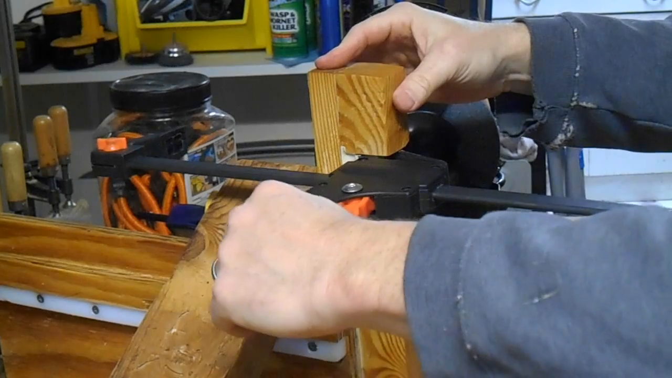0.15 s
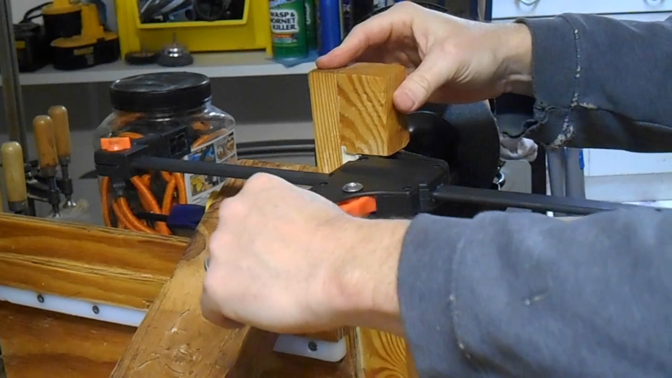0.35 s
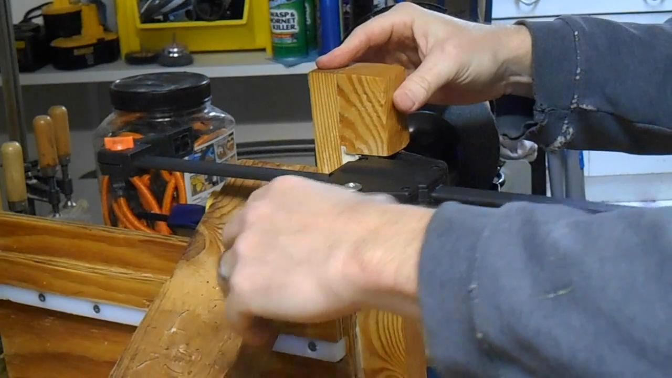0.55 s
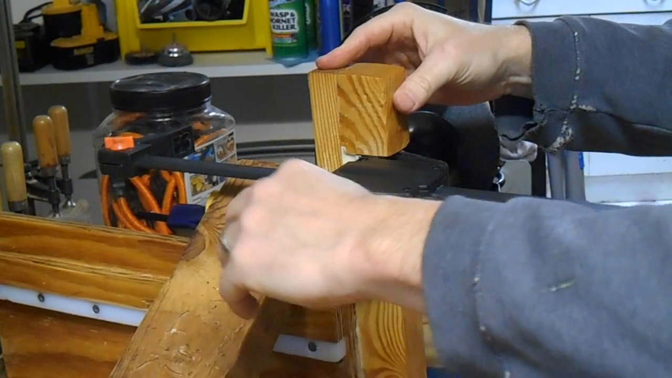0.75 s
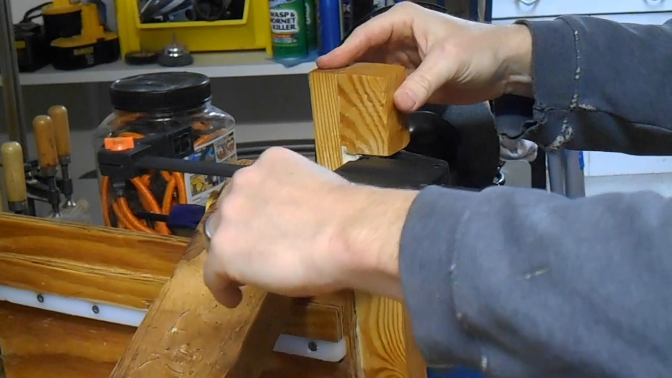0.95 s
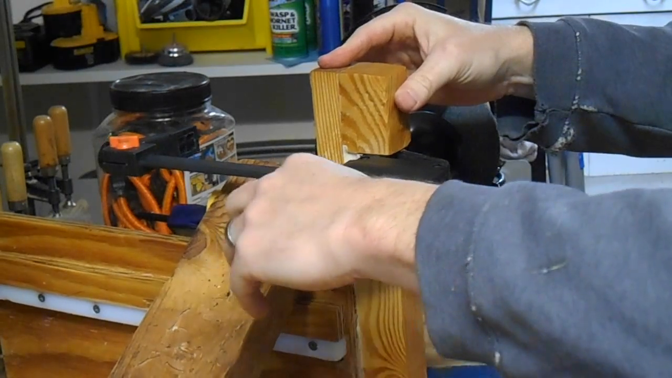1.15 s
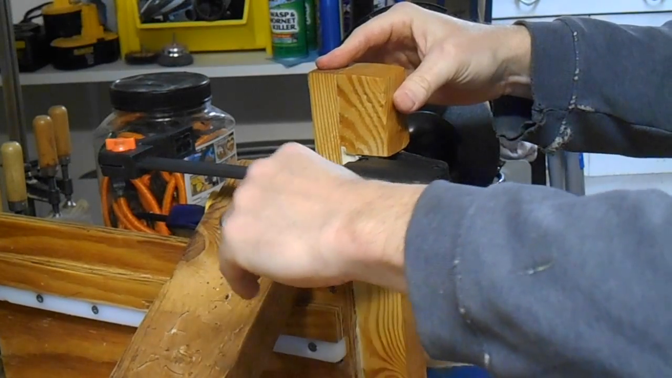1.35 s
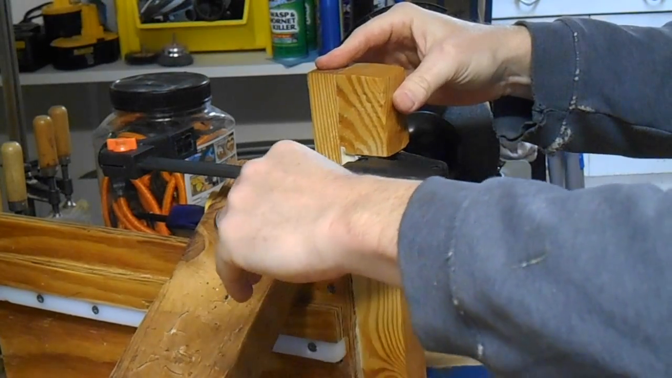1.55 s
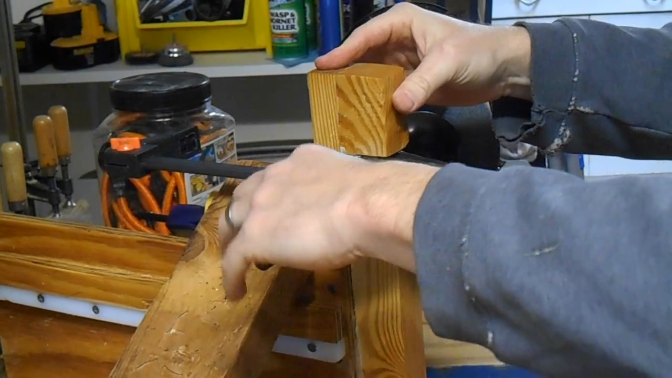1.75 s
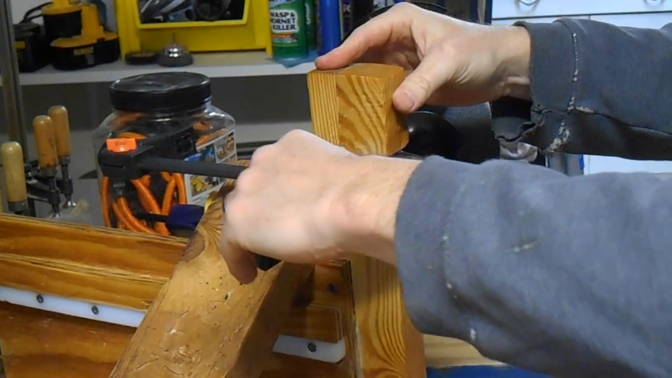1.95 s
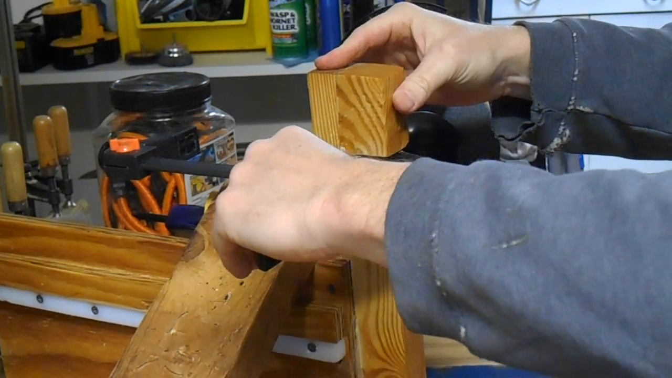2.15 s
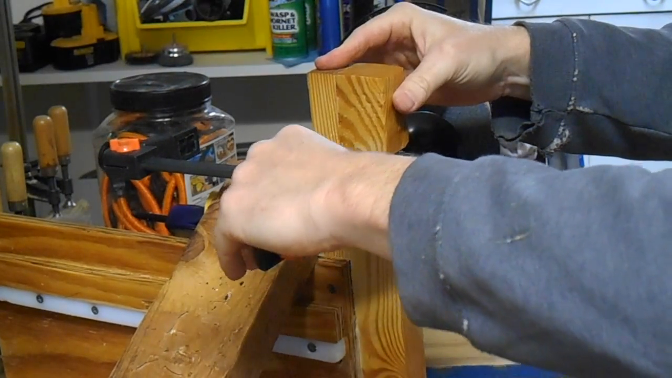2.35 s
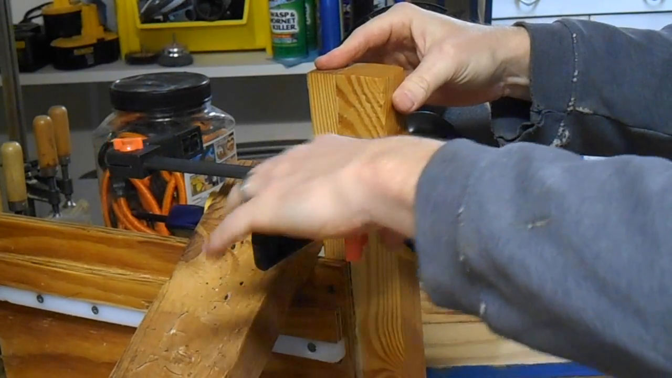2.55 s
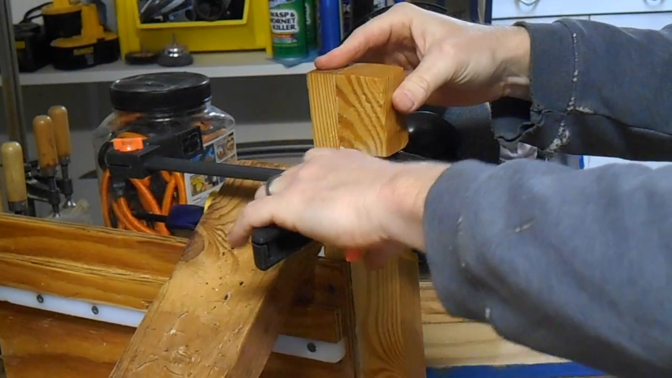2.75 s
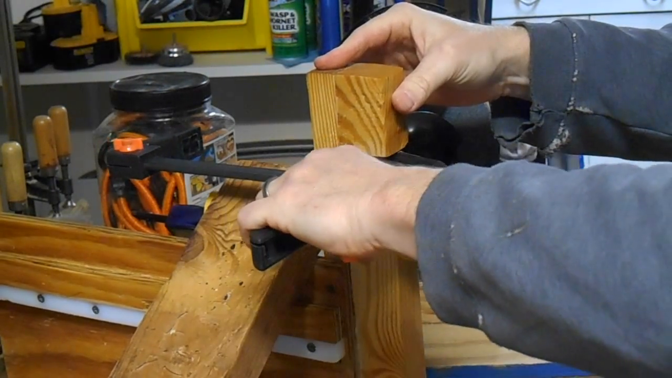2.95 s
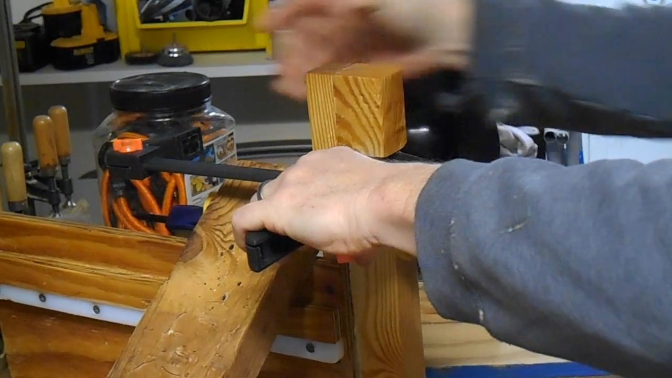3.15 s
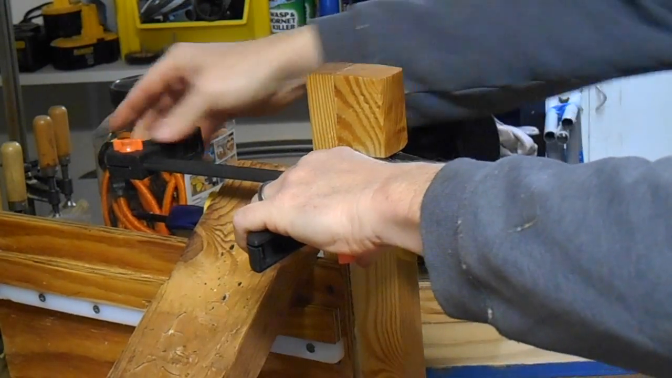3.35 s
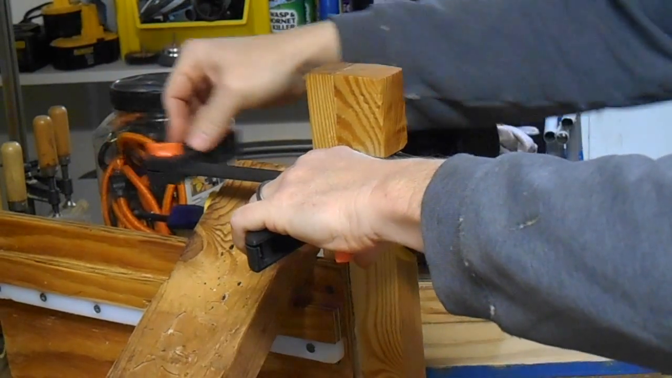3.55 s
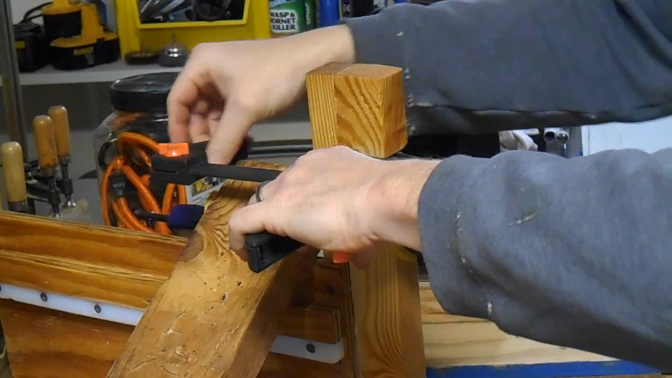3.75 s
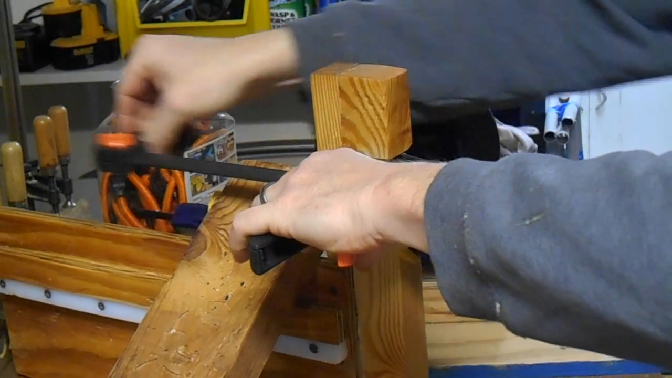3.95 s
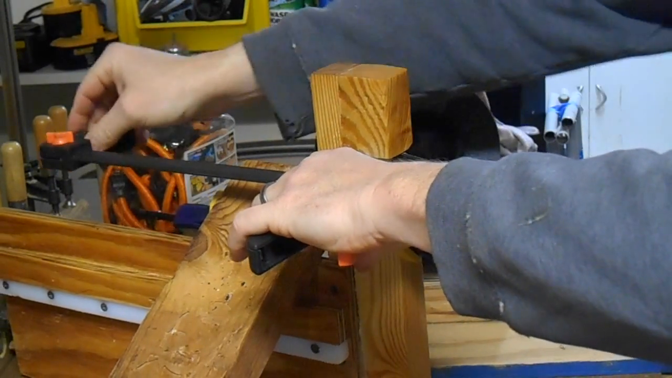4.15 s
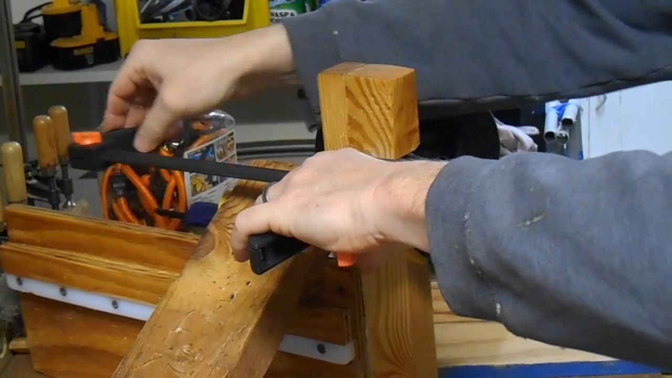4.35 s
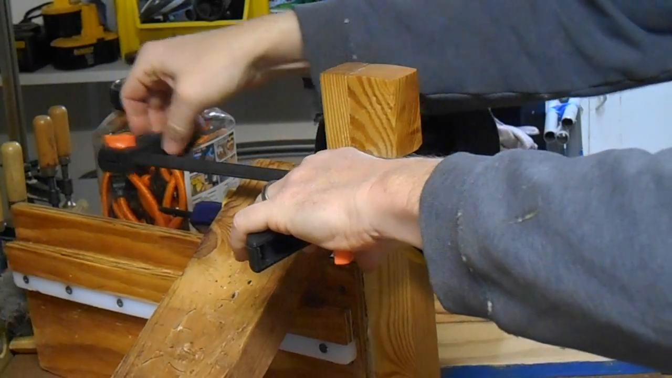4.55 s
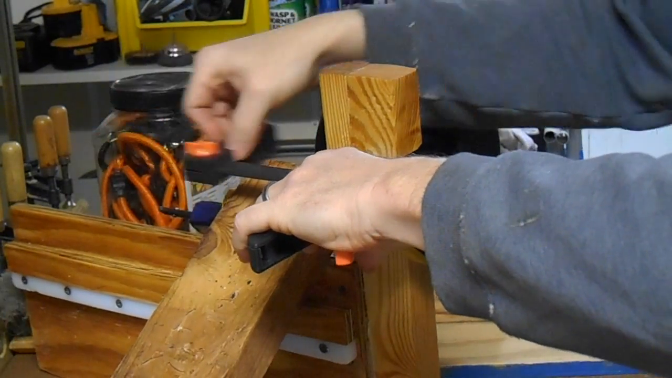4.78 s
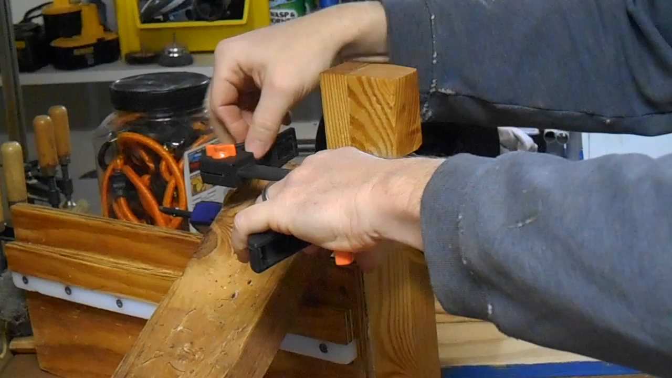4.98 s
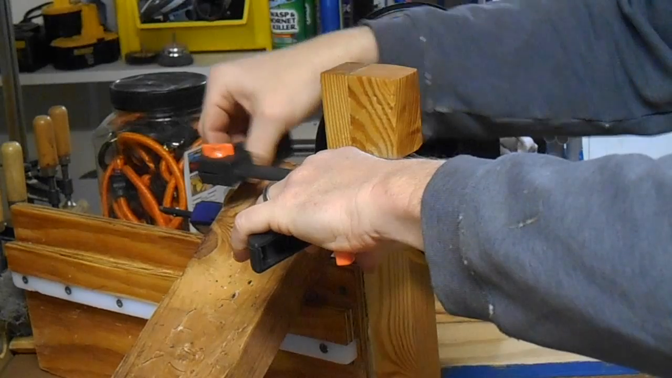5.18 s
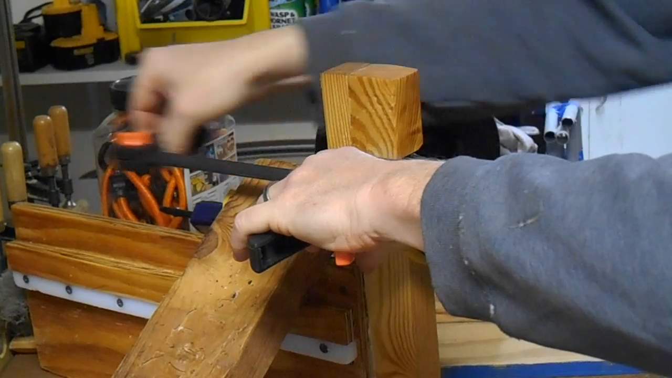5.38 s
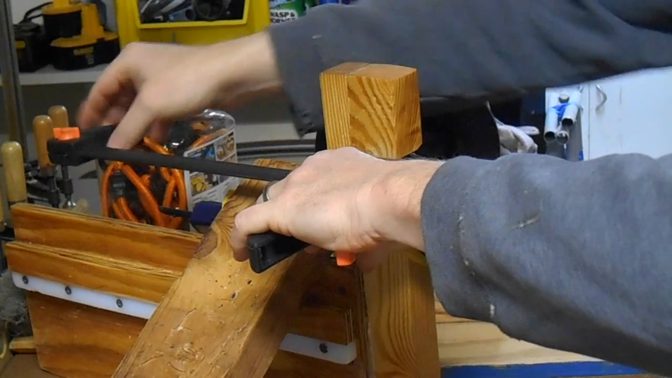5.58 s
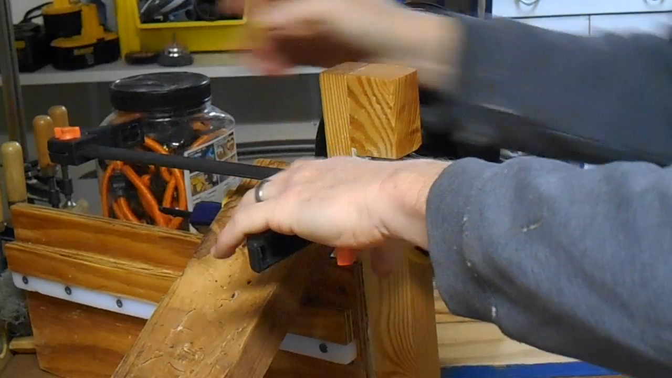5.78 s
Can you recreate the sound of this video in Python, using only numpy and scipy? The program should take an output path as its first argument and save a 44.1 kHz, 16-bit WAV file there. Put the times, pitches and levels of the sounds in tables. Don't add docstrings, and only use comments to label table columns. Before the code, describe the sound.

Hard double snaps and short plate rattles from a hand clamp on a wooden bench, followed by uneven metallic sliding strokes ending in loud clacks.

```python
import sys
import numpy as np
from scipy import signal
from scipy.io import wavfile
from scipy.ndimage import uniform_filter1d

SR = 44100
rng = np.random.default_rng(int(sys.argv[2]) if len(sys.argv) > 2 else 0)


def store_wav(level_fs):
    pcm = np.round(np.clip(np.atleast_2d(level_fs), -1, 1) * 32767)
    wavfile.write(sys.argv[1], SR, pcm.T.astype(np.int16))


def ratio_of_db(decibels):
    return 10 ** (np.asarray(decibels, float) / 20)


N = 256662


def evened(x):
    return x / np.sqrt(np.mean(x ** 2) + 1e-20)


def read(points, hz):
    f, value = np.transpose(points)
    return np.interp(np.log(hz + 1), np.log(f + 1), value)


def coloured(x, colour, tilt_db=0.):
    hz = np.fft.rfftfreq(512, 1 / SR)
    octaves = np.log2((np.minimum(hz, 9000) + 200) / 3000)
    level_db = np.maximum(read(colour, hz) + tilt_db * octaves, -90)
    log_gain = np.log(ratio_of_db(level_db))
    circle = np.concatenate([log_gain, log_gain[-2:0:-1]])
    taps = np.fft.ifft(np.exp(np.conj(signal.hilbert(circle)))).real
    return signal.oaconvolve(x, taps / np.linalg.norm(taps))[:len(x)]


def resonate(x, hz, width):
    r = np.exp(-np.pi * width / SR)
    pole = r * np.exp(2j * np.pi * hz / SR)
    return np.sqrt(2 * (1 - r * r)) * signal.lfilter([1], [1, -pole], x).real


def above(x, hz):
    return signal.sosfilt(signal.butter(2, hz, "high", fs=SR, output="sos"), x)


def wander(length, span):
    return evened(uniform_filter1d(uniform_filter1d(rng.standard_normal(length), span), span))


def add(mix, s, sound):
    part = mix[round(s * SR):][:len(sound)]
    part += sound[:len(part)]


def blows(rows, colour, ring_db, ring_width, rise_s, rise_share, tick_db):
    t = np.arange(2600) / SR
    crack, far, push = np.zeros((3, N))
    for s, db, hz, bench_db, tilt_db, ms in rows:
        rattle = rng.standard_normal(len(t))
        decay = np.clip(ms, .5, 15) / 1000
        shape = np.exp(-t / decay) * np.minimum(t / (rise_s + rise_share * decay), 1)
        tilt_db = np.clip(tilt_db, -10, 10)
        tick = ratio_of_db(tick_db) * (t == 8 / SR)
        dense = coloured(rattle, colour, tilt_db)
        dense = dense / np.sqrt(uniform_filter1d(dense ** 2, size=48) + .1)
        burst = dense * shape + coloured(tick, colour, tilt_db) / 2
        ring = ratio_of_db(ring_db) * resonate(rattle * shape + tick, hz, ring_width)
        add(crack, s, ratio_of_db(db - 12.5) * (burst + ring))
        click = np.linalg.norm(shape) * coloured(1. * (t == 0), colour, tilt_db)
        add(far, s, ratio_of_db(db - 11.5) * click)
        add(push, s + 0.0056, ratio_of_db(db + bench_db) * signal.windows.hann(70))
    return np.array([crack, far, push])


# frequency in Hz, level in dB.
KNOCK_COLOUR = [(290, -40), (500, -7.5), (598, -5.5), (880, 5), (1110, 1), (1430, -5.5), (2480, 8),
                (5290, 0.5), (5740, 5), (9560, -11), (13500, -25)]
TRIGGER_HZ, TOUCH_HZ = 2210, 1990
STOP_BENCH_DB = -37.5


def knock(rows):
    return blows(rows, KNOCK_COLOUR, ring_db=-8, ring_width=550, rise_s=0.00089, rise_share=0.07, tick_db=3.5)


# frequency in Hz, level in dB.
SLIP_COLOUR = [(290, -12), (500, -7.5), (706, -4), (956, 9.5), (1310, -9), (1930, 8), (2840, 1.5),
               (5820, -4), (6500, -1), (10100, -23.5), (13500, -28.5)]


def slip(rows):
    return blows(rows, SLIP_COLOUR, ring_db=-19.5, ring_width=61, rise_s=0.00032, rise_share=.03, tick_db=9)


def glides(rows, width, clean=0):
    out = np.zeros(N)
    span = int(SR / width)
    for s, db, start_hz, end_hz, length in rows:
        t = np.arange(0, length, 1 / SR)
        turns = np.cumsum(np.linspace(start_hz, end_hz, len(t))) / SR
        drift = uniform_filter1d(uniform_filter1d(rng.standard_normal((4000, 2)), span, 0), span, 0)
        a, b = drift[:len(t)].T * np.sqrt(span)
        tone = (clean + a) * np.cos(2 * np.pi * turns) + b * np.sin(2 * np.pi * turns)
        fade = signal.windows.tukey(len(t), .4) * np.exp(-1.2 * t / length)
        add(out, s, ratio_of_db(db) * evened(tone) * fade)
    return out


# frequency in Hz, level in dB.
AIR = [(12, -24), (20, 11), (246, -3.5), (342, -4.5), (558, -5), (1230, -3.5), (1760, 0), (2130, -0.5),
       (3770, -5), (4090, -7.5), (9540, -11.5), (11000, -22.5), (12400, -23.5), (13600, -34)]


def air():
    frames, hz = N // 256 + 5, np.fft.rfftfreq(1024, 1 / SR)
    a, b, patches = rng.standard_normal((frames, 513, 3)).T
    patches = evened(uniform_filter1d(uniform_filter1d(patches, 12, 0), 14, 1))
    z = (a + 1j * b) * ratio_of_db(read(AIR, hz)[:, None] + 0.22 * patches)
    return ratio_of_db(-50) * evened(signal.istft(z, nperseg=1024, noverlap=768)[1][:N])


# start in seconds, peak in dB, brightness in dB per octave, rattle in ms.
TOUCHES = [(0.1024, -27.5, -1, 5), (0.146, -27.5, -4, 6.3), (0.1728, -19.5, 14, 2.2),
           (0.2236, -22.5, -1.5, 7.3), (0.3068, -22, 11, 1.2), (0.392, -17.5, 20, 2.6),
           (2.9893, -40.5, -3, 8.2), (3.0962, -36, -2, 2.9), (3.1659, -22, -5, 2.4),
           (3.8212, -25.5, -1.3, 5.6), (3.866, -31.5, 0, 8.1), (4.332, -24, -11, 2.4),
           (4.446, -22.5, -13, 4), (5.0334, -27, 4, 5.3), (5.7028, -27, 2, 6.3)]


def touches():
    return knock([(s, db, TOUCH_HZ, -48 - db, tilt, ms) for s, db, tilt, ms in TOUCHES])


# start in seconds, level in dB, tone in Hz, length in seconds.
HOLLOWS = [(0.612, -26, 883, 0.022), (1.163, -26.5, 840, 0.016), (1.706, -24.5, 1000, .02),
           (2.503, -26, 880, .025), (0.848, -33.5, 780, .025), (0.915, -28.5, 950, .04),
           (0.925, -40, 330, 0.035), (1.338, -43, 800, .022), (1.396, -35, 1020, .022),
           (1.396, -36, 340, 0.022), (1.435, -36, 316, 0.038), (1.47, -43, 310, 0.023),
           (1.465, -37, 830, .025), (1.546, -41, 300, 0.021), (1.982, -40, 760, 0.03),
           (2.026, -33, 1000, 0.019), (2.05, -34, 1100, .025), (2.078, -41, 280, .025),
           (2.13, -41, 790, 0.017), (4.272, -39, 270, 0.017), (4.438, -39, 1080, .018),
           (4.592, -33, 1220, .02), (4.63, -42, 420, 0.042), (4.722, -29.5, 910, 0.022),
           (4.835, -31, 260, .022), (4.905, -42, 190, .03), (4.95, -42, 420, 0.072),
           (3.545, -40, 420, 0.043), (0.208, -40, 950, .02), (0.208, -27.5, 1780, .018),
           (0.147, -40, 1420, 0.019), (0.32, -46.5, 304, .02), (0.15, -49, 300, 0.022),
           (2.8, -43, 1600, .014), (3.59, -34, 850, 0.044), (3.685, -32.5, 930, 0.045),
           (3.61, -42, 420, .04), (4.265, -41, 760, 0.026), (3.845, -48.5, 198, .05),
           (5.25, -35, 270, .025), (4.04, -36.5, 780, .04), (2.8, -48, 240, 0.023)]


def hollows():
    return glides([(s, db, hz, hz, length) for s, db, hz, length in HOLLOWS], width=49, clean=2)


# frequency in Hz, level in dB, t60 in seconds.
FRAME = [(186, 4.5, 0.14), (155, -10, 0.56), (233.3, -4, 0.26), (103.4, -9.5, 0.26)]
# start in seconds, peak in dB, deepest mode in dB.
THUDS = [(0.148, -39.5, -41), (0.23, -35, -25), (0.359, -36.5, -20), (0.616, -31, -1), (0.851, -31.5, 3),
         (0.895, -23.5, -27), (0.931, -27, -5), (1.172, -24.5, -28), (1.343, -29.5, -29),
         (1.398, -25.5, -28), (1.45, -26, -9), (1.548, -33, -26), (1.711, -24, -5.5), (1.986, -34, -8),
         (2.043, -33, -16), (2.132, -28, -19), (2.213, -34, -14), (2.51, -24, -28), (3.508, -42, 4),
         (3.682, -20, 5), (3.967, -39, -7), (4.276, -37, -24), (4.361, -38, -23), (4.446, -35.5, -21),
         (4.802, -25.5, -9), (4.838, -26, 1.5), (5.256, -30, -11), (5.318, -37, -28), (5.586, -31.5, -19),
         (5.638, -58, -5)]


def thuds():
    push, deep = np.zeros((2, N))
    for s, db, deep_db in THUDS:
        add(push, s, ratio_of_db(db) * signal.windows.hann(160))
        add(deep, s, ratio_of_db(db + deep_db) * signal.windows.hann(160))
    upper = sum(ratio_of_db(db) * resonate(push, hz, 2.0 / t60) for hz, db, t60 in FRAME[:-1])
    hz, db, t60 = FRAME[-1]
    return ratio_of_db(-21.5) * (upper + ratio_of_db(db + 2.5) * resonate(deep, hz, 1.64 / t60))


# start in seconds, peak in dB, rattle in ms.
BUMPS = [
    (0.21, -21, 7),
    (3.5005, -19, 3.4),
    (4.8377, -14, 2.2),
    (5.2475, -16, 4.3),
]


def bumps():
    return knock([(s, db, TOUCH_HZ, -17, -5.5, ms) for s, db, ms in BUMPS])


# time in seconds, level in dB.
SLIDES = [
    [(0.22, -56), (0.256, -41), (0.284, -50), (0.314, -39), (0.37, -42.5), (0.38, -60)],
    [(3.08, -70), (3.094, -46), (3.124, -48), (3.174, -39), (3.21, -83)],
    [(3.52, -50), (3.528, -43), (3.558, -26), (3.618, -17), (3.647, -16.5)],
    [(3.9, -33), (3.918, -36.5), (3.938, -20.5), (3.97, -18.5), (3.995, -24), (4.03, -19.5), (4.2, -31),
     (4.225, -67)],
    [(4.33, -56), (4.35, -33), (4.358, -27), (4.424, -26.5), (4.446, -25.5), (4.5, -49)],
    [(4.54, -52), (4.556, -34.5), (4.61, -17.5), (4.642, -14.5), (4.682, -35), (4.72, -17.5), (4.745, -19),
     (4.786, -17)],
    [(4.81, -30), (4.82, -34), (4.842, -27.5), (4.885, -21), (4.925, -22.5), (4.96, -51)],
    [(5.255, -29), (5.351, -22), (5.397, -21), (5.461, -18.5), (5.54, -18.5), (5.585, -22.5),
     (5.622, -31.5)],
]
# brightness at start and at end in dB per octave, pressure on the bench in dB.
GRIPS = [(6, -7, -21), (0, 2, -11), (4, 0.5, -19), (0, 2.7, -14.5), (10.5, -4.5, -14.5), (11, 0.5, -22),
         (2.5, 0, -12.5), (1, 0.4, -15.5)]
# frequency in Hz, level in dB.
SLIDE_COLOUR = [(180, -44), (300, -19), (419, -29), (516, -17.5), (872, 9), (1020, -4.5), (1240, 9.5),
                (1960, 8), (2830, 5.5), (5360, 2), (8780, -3), (12500, -21), (13500, -35.5)]
# frequency in Hz, width in Hz, level in dB.
BAR = [(1500, 130, -12), (2015, 100, -1.5), (2340, 130, 0.5), (2670, 87, -2.5), (3170, 66, -7),
       (3580, 370, -0.5), (4150, 260, -5), (4800, 280, -16), (5300, 230, -7), (5800, 56, -17),
       (6026, 160, -4), (6520, 85, -7), (8610, 69, -2), (9900, 110, -9.5), (12400, 90, -17)]
# frequency in Hz, width in Hz, level in dB.
BENCH_RUB = [(863, 160, 3.5), (782, 91, 9.5), (1240, 340, 7), (626, 86, -4.5), (427, 14, 2),
             (270, 63, -9.5)]


def swelling_modes(grit, modes, swell_db, span):
    return sum(ratio_of_db(db + swell_db * wander(len(grit), span)) * resonate(grit, hz, width)
               for hz, width, db in modes)


def slide():
    out = np.zeros(N)
    for rows, (start_tilt, end_tilt, bench_db) in zip(SLIDES, GRIPS):
        s, level_db = np.transpose(rows)
        t = np.arange(s[0], s[-1] + 1 / 80, 1 / SR)
        bite_db = 1.8 * np.minimum(rng.exponential(1, len(t)), 5)
        grit = evened(rng.standard_normal(len(t)) * ratio_of_db(bite_db))
        grit = grit * ratio_of_db(0.88 * wander(len(t), 120) + 0.9 * wander(len(t), 30))
        share = np.clip(np.linspace(start_tilt, end_tilt, len(t)) / 8 + .5, 0, 1)
        bright, dull = coloured(grit, SLIDE_COLOUR, 4.), coloured(grit, SLIDE_COLOUR, -4.)
        scrape = share * bright + (1 - share) * dull
        bar = swelling_modes(grit, BAR, swell_db=4.5, span=700)
        rub = evened(swelling_modes(grit, BENCH_RUB, swell_db=5, span=600))
        sound = evened(scrape + ratio_of_db(-14) * bar) + ratio_of_db(bench_db) * rub
        add(out, s[0], ratio_of_db(np.interp(t, s, level_db) - 5.5) * sound * signal.windows.tukey(len(t), .05))
    return out


def patchy(x):
    hz, t, z = signal.stft(x, SR, nperseg=256)
    patches = rng.standard_normal((len(t), len(hz))).T
    patches = evened(uniform_filter1d(uniform_filter1d(patches, size=5, axis=0), size=6, axis=1))
    return signal.istft(z * ratio_of_db(1.7 * patches), SR, nperseg=256)[1][:N]


# release in seconds, level in dB, growth time in seconds.
SWELLS = [
    (0.597, -35, 0.019),
    (1.148, -40, 0.032),
    (1.693, -41.5, 0.04),
    (2.491, -40, 0.021),
]


def swell():
    out, t = np.zeros(N), np.arange(-.08, 0, 1 / SR)
    for s, db, growth in SWELLS:
        hiss = coloured(rng.standard_normal(len(t)), SLIDE_COLOUR, 2.4)
        add(out, s + t[0], ratio_of_db(db) * hiss * np.exp(t / growth))
    return out


# start in seconds, peak in dB, rattle in ms.
PAWL = [
    (0.5969, -6, 5.5),
    (1.1486, -5.5, 5.4),
    (1.691, -5, 4.7),
    (2.489, -5.5, 4),
]


def pawl():
    return knock([(s, db, TRIGGER_HZ, -25, -1.25, ms) for s, db, ms in PAWL])


# start in seconds, peak in dB, brightness in dB per octave, rattle in ms.
LANDINGS = [
    (0.6152, -5, 1, 4),
    (1.1668, -4, 2, 4.5),
    (1.7061, 2, 1.5, 6.5),
    (2.5041, 0, 1.5, 6.3),
]


def landings():
    return knock([(s, db, TRIGGER_HZ, -16.5 - db, tilt, ms) for s, db, tilt, ms in LANDINGS])


# start in seconds, peak in dB, brightness in dB per octave, rattle in ms.
SLACK = [(0.818, -27, -4, 6.1), (0.832, -21.5, 3.5, 11), (0.851, -12.5, 2, 2.1), (0.859, -21.5, 5, 5.4),
         (1.337, -24, -5.5, 4.1), (1.3521, -19.5, 4, 11), (1.3699, -16.5, 5, 5.8), (1.9385, -29, -3, 4.9),
         (1.96, -26, 1, 9.1), (1.9837, -19, -1, 3.5), (2.1314, -21.5, 0, 10), (2.1375, -23, -5, 4.7)]


def slack():
    return slip([(s, db, 1760, -21.5, tilt, ms) for s, db, tilt, ms in SLACK])


# start in seconds, peak in dB, brightness in dB per octave, rattle in ms.
SLIPS = [(0.8775, -8, -2, 1.3), (0.8797, -1.5, 2, 4), (0.8899, -5, 7.5, 5.4), (0.9011, -4, -2, 3.9),
         (0.9113, -2.5, 7.5, 4.4), (0.9222, -5.5, 3, 4.1), (0.9303, -1.5, 11, 3.4), (0.9405, -16, 2, 6.8),
         (0.9474, -11.5, 1, 6.2), (0.9654, -9.5, 1.5, 1.7), (1.3968, -13, -5, 1.7), (1.399, 1, 4.5, 4.1),
         (1.4088, -6.5, 4, 6), (1.4203, -12, -1, 5), (1.425, -23, 1, 2.6), (1.4303, -3.5, 3.5, 6.6),
         (1.444, -9, 1, 4.2), (1.4505, -15, -1, 5.5), (1.4597, -16.5, -1, 6.4), (1.4735, -17, 2, 2.3),
         (1.4785, -13.5, 1.5, 3.1), (2.03, -9, 1, 5.3), (2.0404, -8.5, 8, 7.4), (2.05, -12, 3, 5.1),
         (2.0598, -10, 2, 5.2), (2.0811, -13.5, 9, 4.5), (2.1012, -23, 5, 6.2)]


def plates():
    return slip([(s, db, 1890, -33, tilt, ms) for s, db, tilt, ms in SLIPS])


# start in seconds, level in dB, start in Hz, end in Hz, length in seconds.
RINGS = [(2.7305, -22, 2600, 2750, .009), (2.7298, -26, 3700, 3600, 0.0043),
         (0.88, -16, 5800, 6500, 0.0056), (0.8805, -18.5, 1900, 1700, 0.0062),
         (0.922, -17, 1900, 1950, .008), (0.931, -16.5, 2200, 1880, 0.017),
         (4.2725, -22, 3500, 3450, 0.0094), (4.771, -22, 10200, 10200, 0.0099),
         (3.626, -38, 10100, 10100, 0.02), (2.0275, -32, 1900, 1900, 0.0035),
         (2.0715, -18.5, 1880, 1880, 0.0063), (2.507, -12, 6600, 8300, 0.016),
         (2.511, -11.5, 4950, 4950, 0.013), (2.505, -16.5, 2000, 2150, 0.0138),
         (2.525, -33, 7500, 8100, 0.034), (1.7075, -13.5, 6900, 6200, 0.02),
         (1.399, -13, 1700, 1840, 0.0096)]


def rings():
    return glides(RINGS, width=600)


# start in seconds, level in dB, start in Hz, end in Hz, length in seconds.
CHIRPS = [(0.89, -35.5, 1400, 1430, 0.031), (3.657, -21, 1000, 900, 0.03), (3.658, -23, 830, 760, 0.03),
          (3.663, -9, 6460, 6120, 0.014), (4.716, -27.5, 8740, 8600, 0.09),
          (5.359, -15.5, 2245, 1960, 0.0356), (5.622, -23, 2050, 1960, 0.016),
          (5.791, -26, 1427, 1440, 0.016), (5.792, -23, 2620, 2680, 0.014),
          (2.7315, -39, 1660, 1660, 0.022), (3.449, -56, 5100, 5050, 0.018)]


def chirps():
    return glides(CHIRPS, width=150, clean=1)


# start in seconds, peak in dB, rattle in ms.
BOUNCES = [
    (1.7109, 2.5, 2.9),
    (2.5106, 2, 3.9),
    (2.516, -8, 1.5),
]


def bounces():
    return knock([(s, db, TRIGGER_HZ, STOP_BENCH_DB, 8.5, ms) for s, db, ms in BOUNCES])


# start in seconds, level in dB, start in Hz, end in Hz, length in seconds.
SCUFFS = [
    (2.7298, -23, 3200, 2900, 0.0094),
    (4.834, -15.5, 2214, 1890, 0.0097),
    (5.115, -50, 9500, 9900, .035),
]


def scuffs():
    return glides(SCUFFS, width=2500)


# start in seconds, peak in dB, ring in Hz, brightness in dB per octave, rattle in ms.
STOPS = [(2.7301, -19.5, 2110, -1, 3), (3.6596, -3, 2260, 1, 5.9), (3.6657, 1.5, 3720, 4.5, 5.8),
         (3.6677, 1.5, 6200, 10, 2.1), (4.2615, -20.5, 2500, -6.5, 3.8), (4.2713, -11, 2160, 2, 4.1),
         (4.7706, -5.5, 6800, 4, 6.9), (4.7954, 4, 2070, 1.5, 2.9), (4.8013, 5, 5230, -1, 3.2),
         (5.241, -6.5, 5160, 0.5, 7.8), (5.3626, -14, 2270, -8, 4.1), (5.3704, -13, 1990, -5, 2.6),
         (5.378, -22, 2050, 1, 2.5), (5.623, -6, 2210, 5.5, 4.3), (5.7765, -18.5, 2830, -1.5, 3.9),
         (5.7901, -13, 2700, 0.5, 4.5)]


def stops():
    return knock([(s, db, hz, STOP_BENCH_DB, tilt, ms) for s, db, hz, tilt, ms in STOPS])


# start in seconds, level in dB, start in Hz, end in Hz, length in seconds.
GRIT = [(3.935, -34, 2210, 2400, 0.016), (3.951, -30, 2710, 2500, 0.028), (3.956, -28, 1534, 1520, 0.026),
        (4, -27.5, 2150, 2410, 0.037), (4.007, -27, 1530, 1730, .018), (4.028, -30, 5500, 5300, 0.028),
        (4.042, -30, 2780, 1900, .022), (4.053, -33, 5900, 6060, 0.02), (4.078, -34, 3170, 3370, 0.021),
        (4.105, -34.5, 1525, 1515, 0.077), (4.353, -32, 5800, 6200, 0.021), (4.359, -39, 2580, 2500, 0.027),
        (4.442, -34.5, 1296, 1390, 0.015), (4.475, -39, 3500, 3000, 0.014),
        (4.594, -23.5, 2224, 1950, 0.033), (4.62, -25, 2010, 2310, 0.03), (4.621, -22, 4800, 4800, .012),
        (4.626, -26, 3640, 3710, 0.039), (4.729, -32, 3300, 3200, .02), (4.742, -26, 2500, 2400, .024),
        (4.882, -28, 5070, 5070, 0.039), (5.296, -28, 5200, 3800, .014), (5.445, -31, 4150, 4230, .02),
        (5.457, -23.5, 880, 900, 0.013), (5.467, -25, 3010, 4160, 0.015), (5.47, -25, 6100, 6000, 0.013),
        (5.489, -30, 1900, 1980, 0.025), (5.497, -21.5, 5350, 5300, 0.03), (5.525, -21, 5300, 5250, .03),
        (5.503, -24.5, 2660, 2850, 0.024), (5.521, -27, 3160, 3400, 0.016), (5.528, -27, 1663, 1800, 0.016),
        (5.57, -26, 5800, 5800, 0.014)]


def rough_patches():
    return glides(GRIT, width=330)


# frequency in Hz, level in dB, t60 in seconds.
BENCH = [(409.3, 0.5, 0.25), (427.8, 1.5, 0.18), (456, -12, .06), (348, -10.5, 0.17), (300, -20, 0.093),
         (547, -10.5, .09), (695, -7, 0.021)]


def board(push, damping):
    return sum(ratio_of_db(db) * resonate(push, hz, damping * np.log(1000) / np.pi / t60) for hz, db, t60 in BENCH)


# frequency in Hz, level in dB, t60 in seconds.
CLAMP = [(826, -17, 0.086), (950, -54, 0.091), (1495, 2.5, 0.037), (1654, -0.5, 0.16), (1932, -2, 0.042),
         (2150, -16, 0.048), (2304, -9, 0.035), (2500, -20, 0.071), (3094, -6.5, 0.12), (3390, -1, 0.03),
         (3980, -9.5, 0.097), (4510, -0.5, 0.012), (4903, -2, 0.11), (5250, -38, 0.13), (5700, -27, 0.013),
         (6310, -6, 0.016), (6770, -7.5, 0.15), (7430, -9.5, 0.0073), (7560, -4.5, 0.096),
         (8350, -2, 0.037), (10060, 0, 0.036)]


def clamp():
    knocks = touches() + bumps() + pawl() + landings() + bounces() + stops()
    slips = slack() + plates()
    crack = knocks[0] + slips[0]
    far = knocks[1] + ratio_of_db(-3) * slips[1]
    body = sum(ratio_of_db(db) * resonate(crack, hz, 5.87 / np.clip(t60, .015, 1 / 12)) for hz, db, t60 in CLAMP)
    bench = board(knocks[2], 0.87) + board(slips[2], 2.7)
    crack, body, bench = above(crack, 300), above(body, 500), above(bench, 220)
    near = crack + ratio_of_db(-11.5) * body + ratio_of_db(-11) * bench
    return near, far + ratio_of_db(-13) * body + ratio_of_db(-25) * bench


# frequency in Hz, t60 in seconds.
ROOM = [(100, 0.59), (400, 0.72), (1000, 0.4), (2000, 0.32), (5000, 0.31), (8000, 0.24), (12000, 0.18)]


def room(x):
    out, t_mix = np.zeros(N), np.arange(N) / SR
    for k in range(3):
        taps = np.zeros(SR // 2)
        at = np.arange(120, SR // 2 - 20, 20)
        taps[at + rng.integers(0, 20, len(at))] = rng.choice([-1., 1.], len(at))
        hz, t, z = signal.stft(taps, SR, nperseg=256)
        tail = signal.istft(z * ratio_of_db(-60 * t / read(ROOM, hz)[:, None]), SR, nperseg=256)[1]
        window = np.sqrt(2 / 3) * np.cos(9 * t_mix + k * np.pi / 3)
        sway = np.sqrt(2) * np.cos(45 * t_mix + k * np.pi / 3)
        out += sway * signal.fftconvolve(x * window, tail / np.linalg.norm(tail))[:N]
    return out


# frequency in Hz, level in dB.
MIC = [(9000, -3), (10200, -1.5), (11100, -10.5), (12100, 0), (13000, -28), (13700, -10)]


def scene():
    near, far = clamp()
    rubbing = patchy(slide()) + swell()
    tones = hollows() + rings() + chirps() + scuffs() + rough_patches()
    echo = room(ratio_of_db(-5) * far + ratio_of_db(-8) * rubbing + tones / 3.5)
    mono = coloured(near + rubbing + tones + thuds() + echo + air(), MIC)
    return np.array([mono, mono])


def top_cut(x):
    return signal.sosfilt(signal.butter(12, 15660, fs=SR, output="sos"), x)


def record(dry):
    limited = signal.oaconvolve(dry, signal.firwin(255, 13700, fs=SR)[None], "same")
    return top_cut(np.clip(limited, -1, 1))


dry = scene()
out = record(dry)
store_wav(out)
```